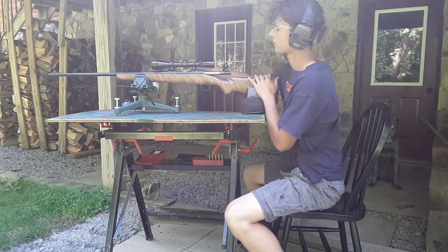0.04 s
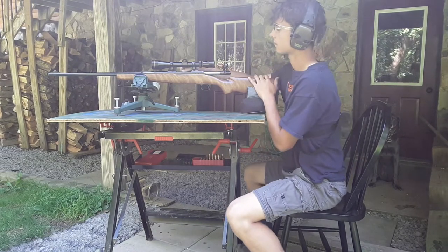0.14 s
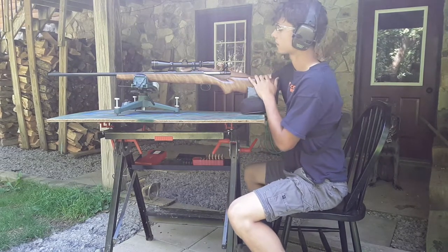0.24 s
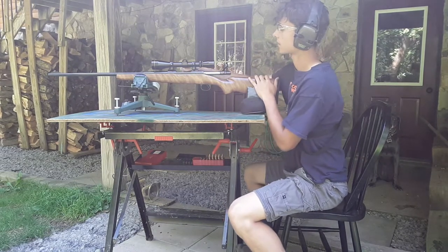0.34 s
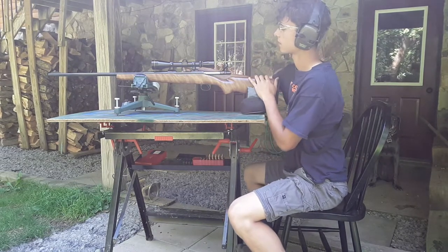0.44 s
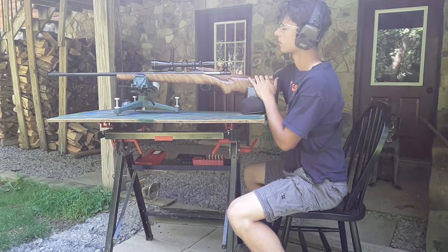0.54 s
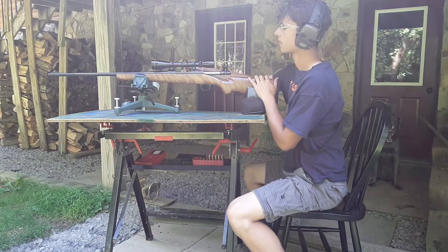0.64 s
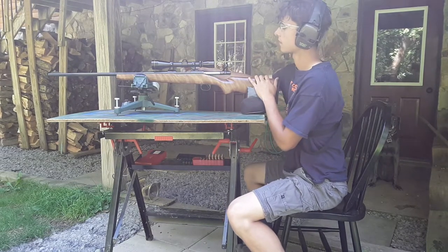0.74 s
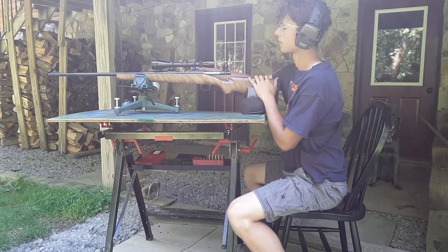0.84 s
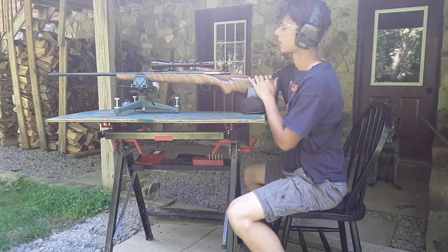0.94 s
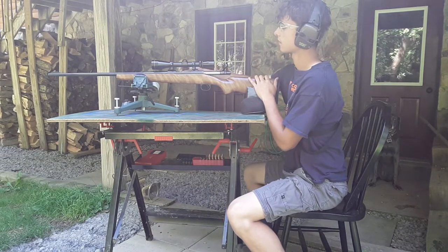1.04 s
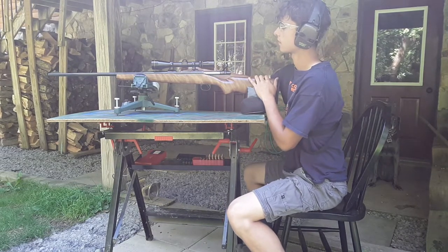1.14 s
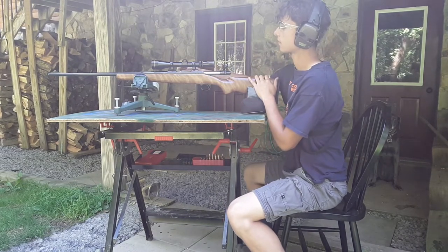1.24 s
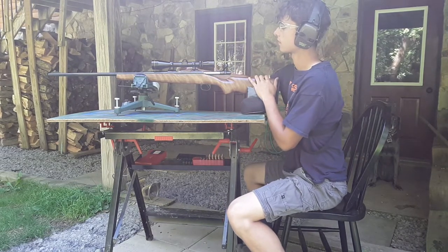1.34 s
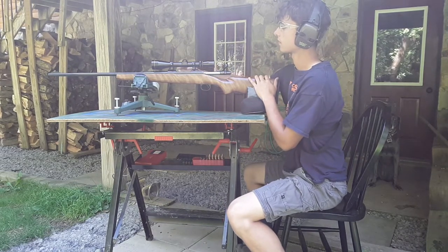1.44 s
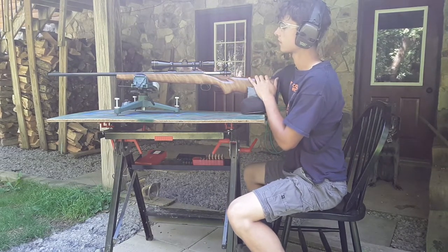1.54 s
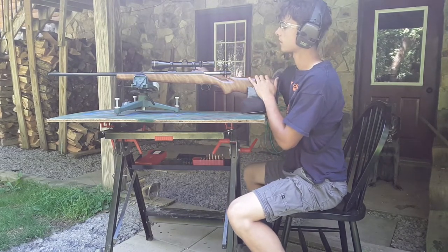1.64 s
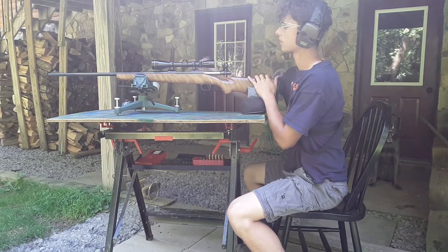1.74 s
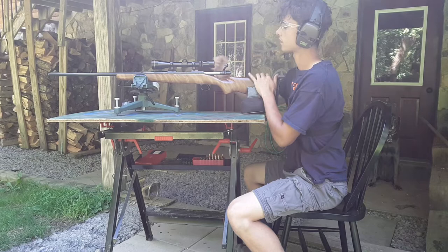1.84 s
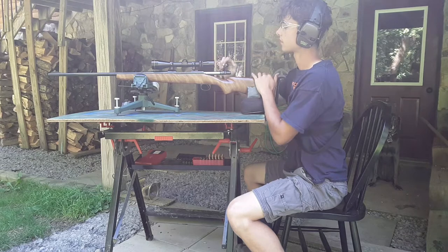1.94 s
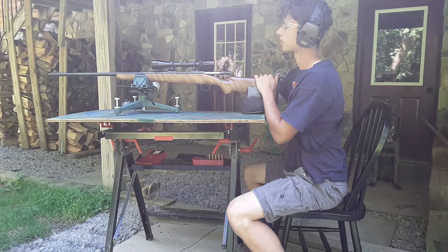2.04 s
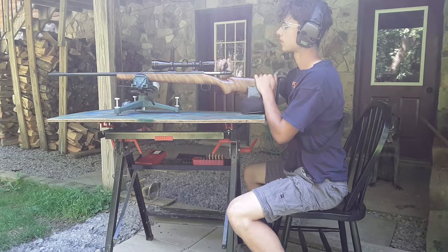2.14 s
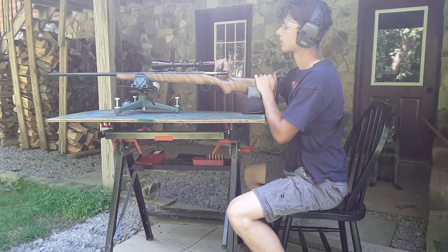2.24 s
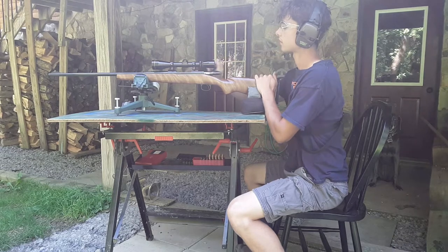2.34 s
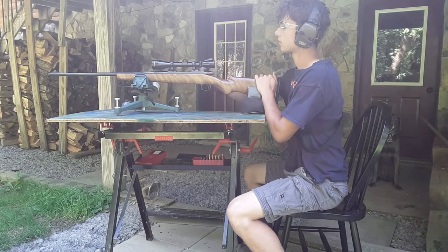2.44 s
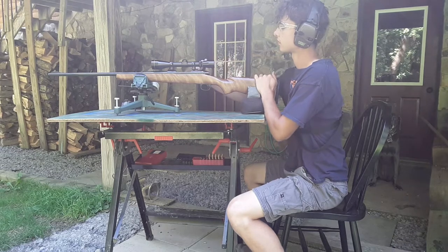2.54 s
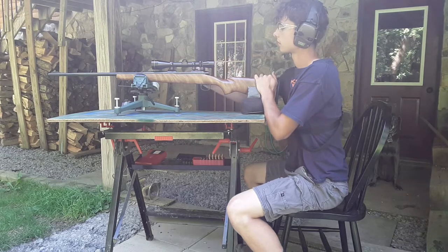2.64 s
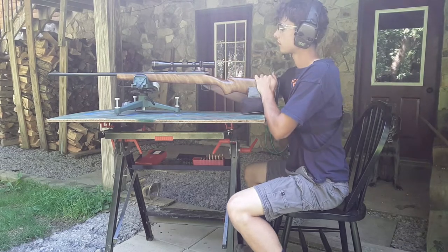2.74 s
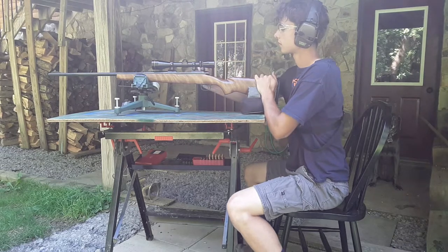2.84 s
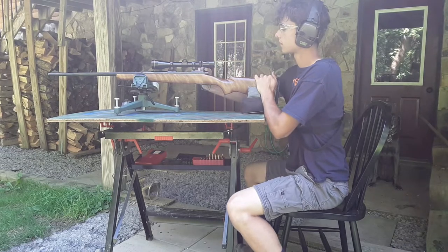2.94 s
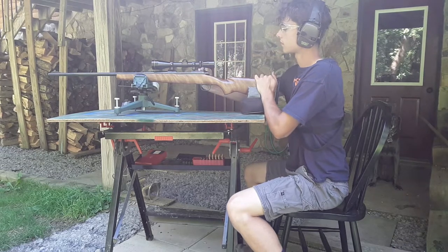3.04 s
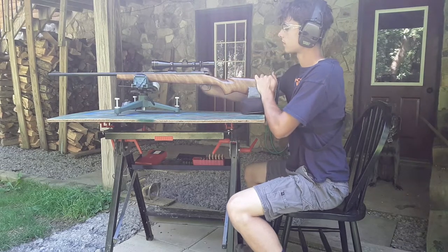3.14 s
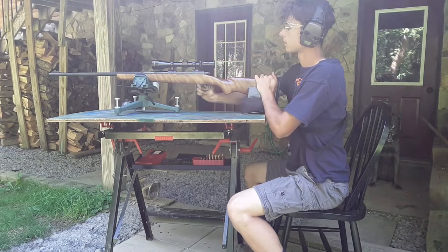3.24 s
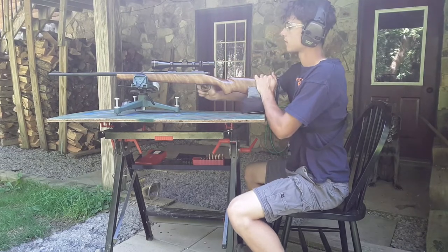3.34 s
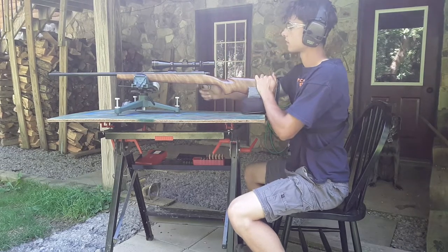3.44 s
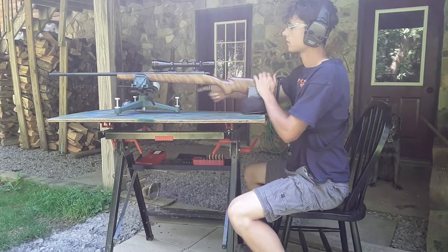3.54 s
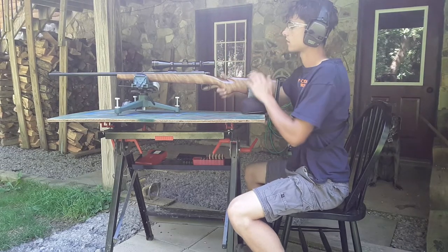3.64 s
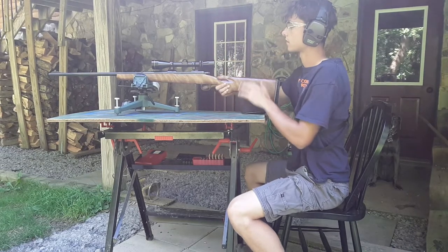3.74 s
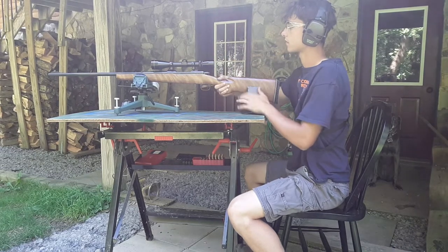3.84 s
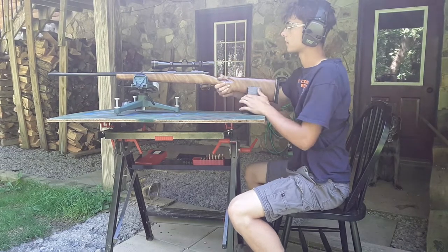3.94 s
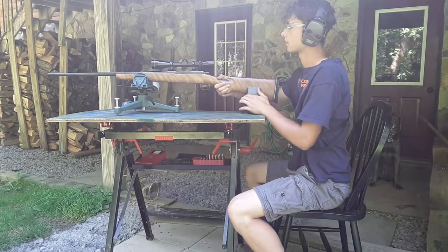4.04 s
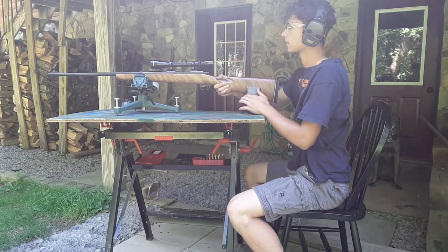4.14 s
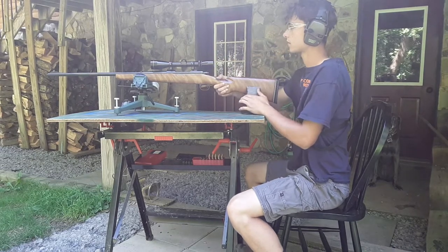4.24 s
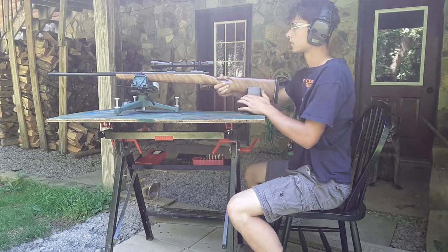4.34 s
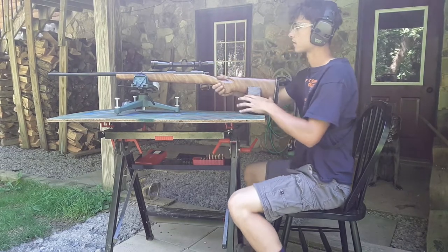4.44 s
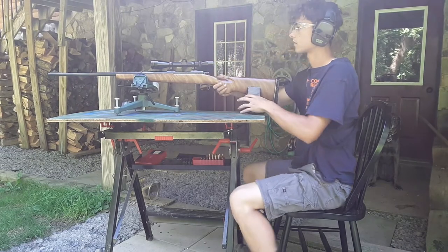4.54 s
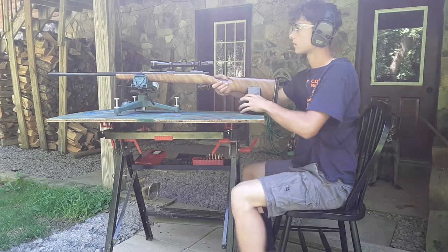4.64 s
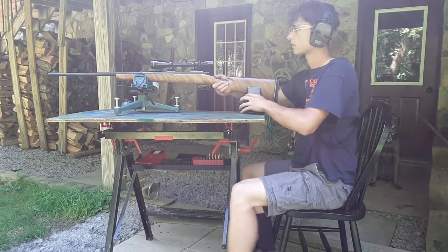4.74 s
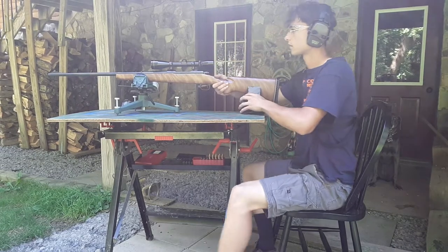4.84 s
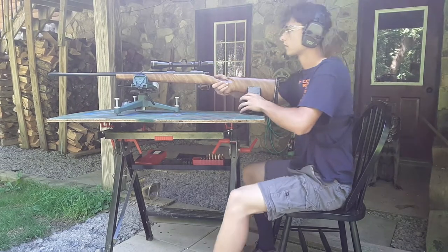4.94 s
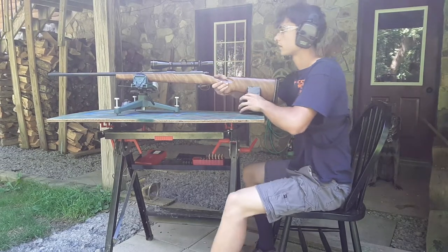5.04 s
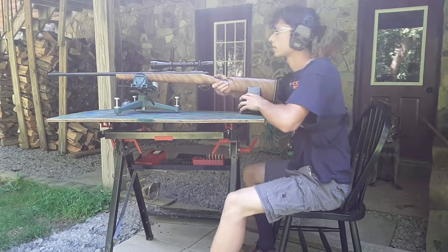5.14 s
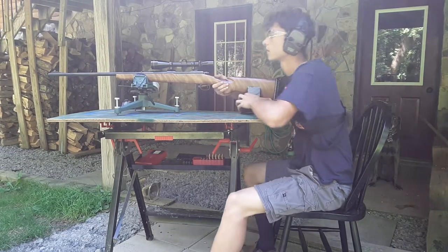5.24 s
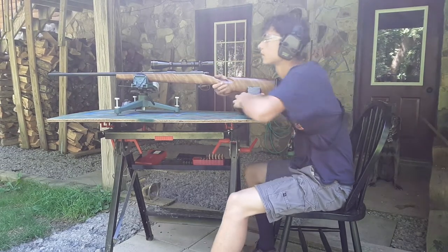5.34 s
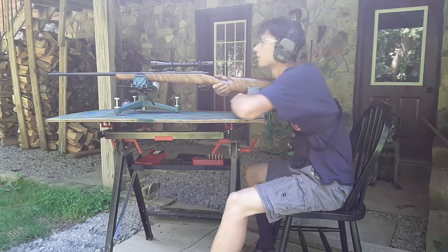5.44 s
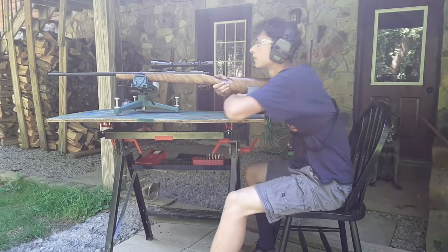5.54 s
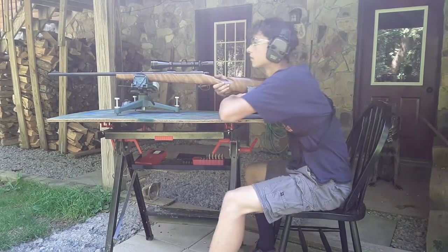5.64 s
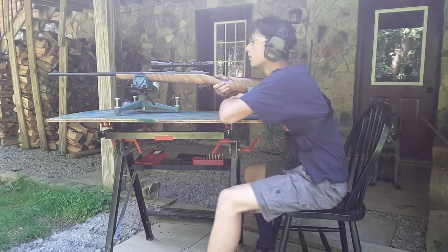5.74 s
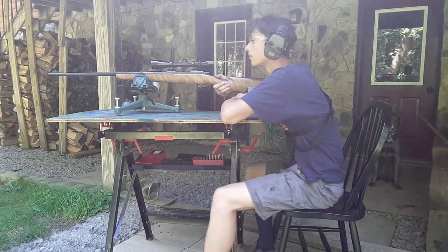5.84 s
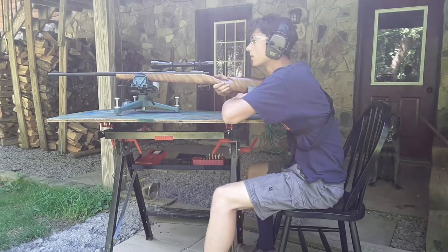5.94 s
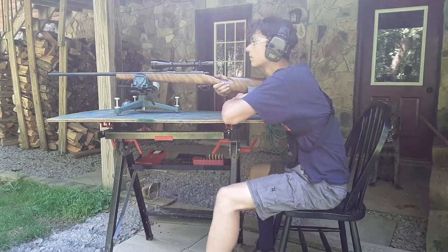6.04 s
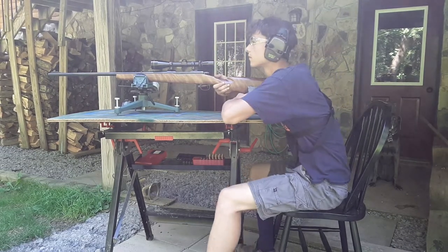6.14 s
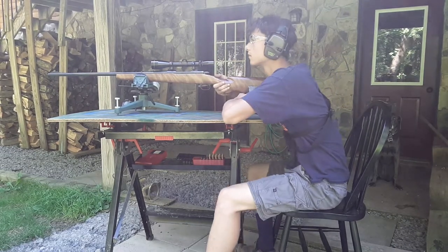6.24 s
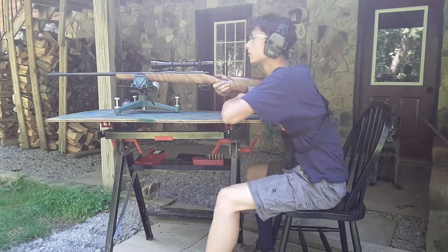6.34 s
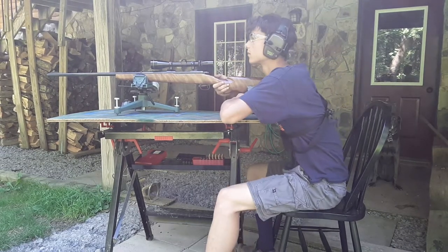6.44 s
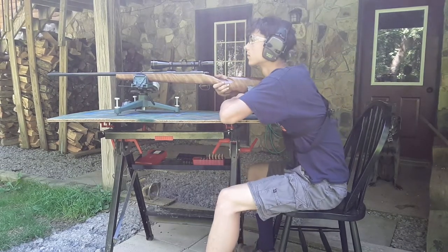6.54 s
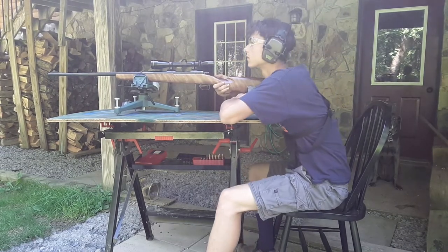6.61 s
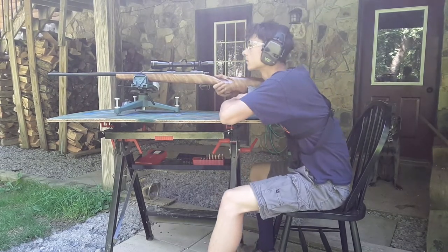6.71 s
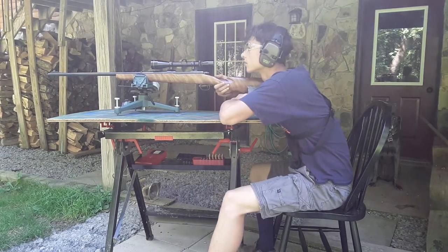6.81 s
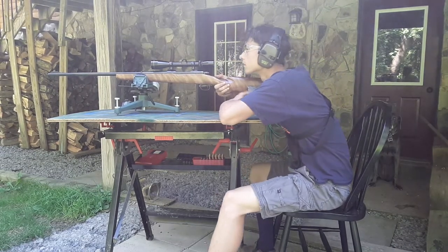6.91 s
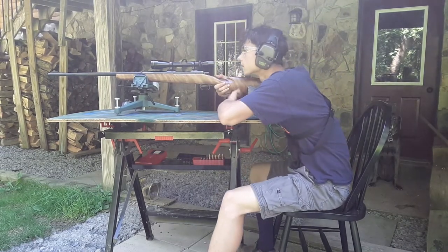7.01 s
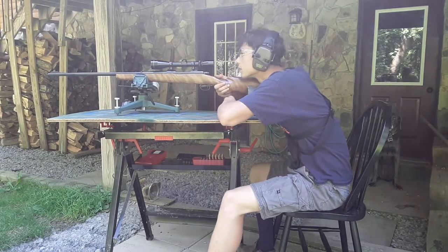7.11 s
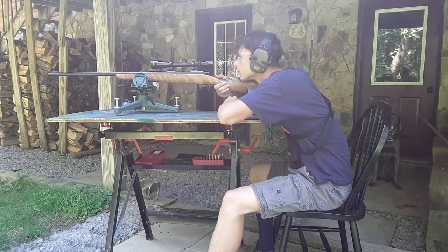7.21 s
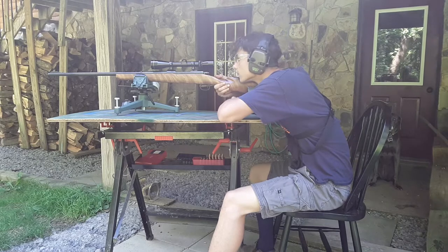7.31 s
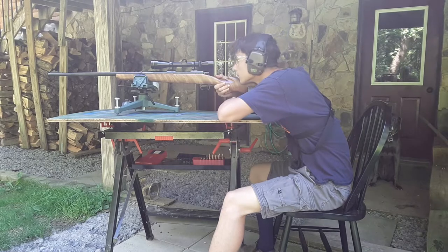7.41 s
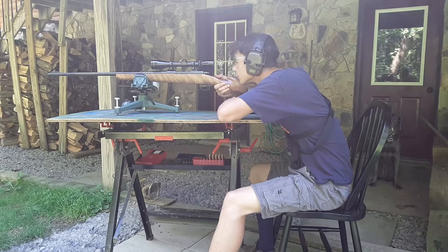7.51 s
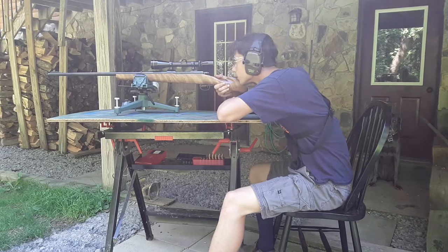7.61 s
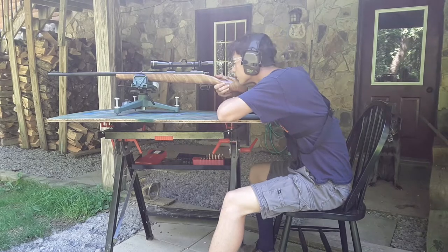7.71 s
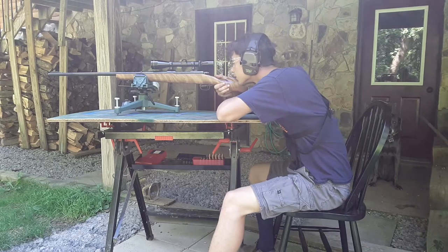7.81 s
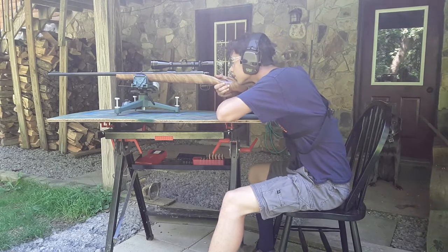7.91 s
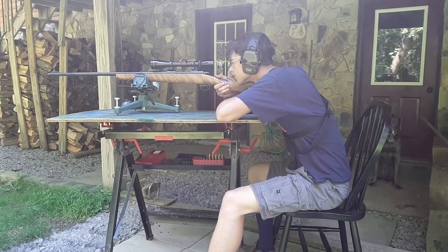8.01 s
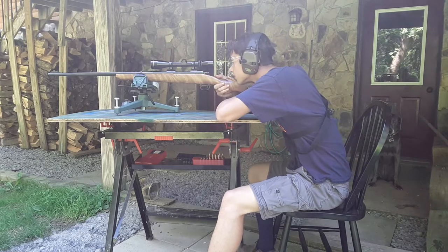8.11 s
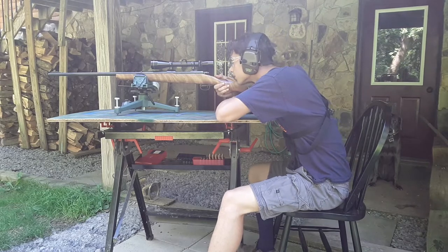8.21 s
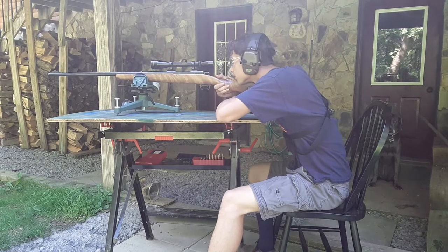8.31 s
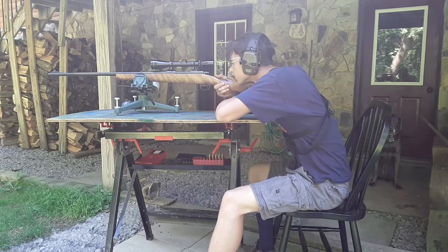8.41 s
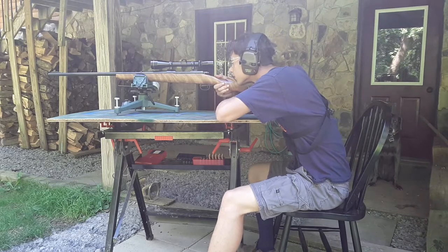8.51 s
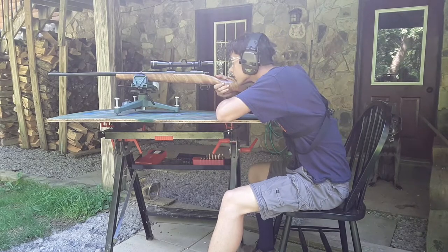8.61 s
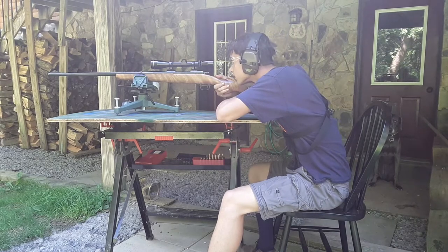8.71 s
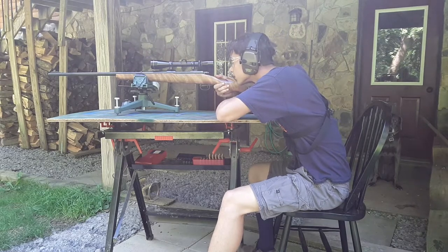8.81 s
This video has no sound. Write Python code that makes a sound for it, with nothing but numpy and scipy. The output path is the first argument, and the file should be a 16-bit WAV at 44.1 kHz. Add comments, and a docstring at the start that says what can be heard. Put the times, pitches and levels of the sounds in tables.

```python
"""A bolt-action rifle is loaded at a bench under a stone porch; hiss, rumble, a faint drone and far birds lie outside.
A brass cartridge clinks, then the bolt rubs along the raceway, is pushed home and locked, and a steel catch snaps.
The background dips around the fourth second; then the shooter settles with rustles, dull bumps and light knocks.
Blows are noise chatter plus decaying modes; rubbing, cloth and air are coloured noise; birds and drone are raspy sines.
The porch adds dense noise echoes."""
import sys
import numpy as np
from scipy import signal
from scipy.fft import rfft, irfft, next_fast_len
from scipy.io import wavfile
from scipy.ndimage import uniform_filter1d

SR = 44100
rng = np.random.default_rng(int(sys.argv[2]) if len(sys.argv) > 2 else 0)


def store_pcm(level_fs):
    """Save levels as 16-bit WAV."""
    pcm = np.round(np.clip(level_fs, -1, 1) * 32767).astype(np.int16)
    wavfile.write(sys.argv[1], SR, np.atleast_2d(pcm).T)


N = 391166
TIME = np.arange(N) / SR
AGE = np.arange(16384) / SR   # seconds since a blow
MILLISECOND = SR / 1000   # in samples; blow levels are rms over 1 ms
SIDES = np.array([[.5], [-.5]])   # left, right: splits a left-minus-right dB value

# modes of the struck cartridge: pitch_hz, level_db, t60_s
BRASS = [(1340, -28, 0.099), (2700, -1, 0.025), (3250, -9, 0.027), (4470, -2, .02), (4800, 1, 0.092),
         (4845, -2.5, 0.16), (6730, 1, 0.034), (7630, -9, 0.072), (10400, -21, 0.2), (10390, 2.5, .05),
         (13950, -24, 0.082)]
# modes of the raceway: pitch_hz, level_db, t60_s
RACEWAY = [(1320, -16, .03), (3090, -8, 0.019), (4890, 2, 0.029), (5290, 1.5, 0.04), (6680, 3.5, 0.033),
           (7370, 4.5, 0.028), (10950, -14, 0.084), (13900, -21, .07)]
# modes of the bolt: pitch_hz, level_db, t60_s
BOLT = [(830, -13, 0.02), (905, -5, 0.011), (1192, -17, 0.031), (1800, -5, 0.023), (3750, -2, 0.033),
        (4400, -17, 0.015), (5320, 1, 0.027), (6630, 2.5, 0.03), (6840, 4.5, 0.033)]
# modes of the steel catch: pitch_hz, level_db, t60_s
CATCH = [(665, -5, 0.019), (765, 0.5, 0.014), (1170, -11, 0.0039), (1266, -4, 0.028), (1680, 3.5, 0.017),
         (1860, 3.5, .017), (1940, -10, 0.013), (3024, -3, 0.031), (4230, -8, 0.022), (5630, -1, 0.013),
         (6550, 3.5, 0.02), (6850, 1.5, 0.02)]
# spectrum of distant rumble, also of rustling cloth: freq_hz, level_db
RUMBLE = [(60, -12), (130, 2), (200, -0.5), (300, -3.5), (450, -4), (700, -4), (900, -9.5), (1200, -12.5),
          (1600, -51)]
# spectrum of deep stirring: freq_hz, level_db
DEEP = [(15, -30), (28, -11), (50, -2), (100, 0), (150, -11.5), (300, -39.5)]


def from_db(db):
    """Decibels to gain."""
    return 10 ** (np.asarray(db) / 20)


def unit_energy(x):
    """Scale to energy 1 per channel."""
    return x / np.sqrt(np.sum(x ** 2, axis=-1, keepdims=True) + 1e-20)


def at_hz(points, hz):
    """Read a spectrum on a log-frequency axis."""
    f, value = np.transpose(points)
    return np.interp(np.log(hz + 1), np.log(f), value)


def bins(x):
    """Frequencies of a signal's spectrum."""
    return np.fft.rfftfreq(x.shape[-1], 1 / SR)


def colour(x, db):
    """Causal (minimum-phase) filter with the given gain at each frequency."""
    cepstrum = irfft(np.log(from_db(db)))
    half = cepstrum.shape[-1] // 2
    # fold negative time onto positive time
    cepstrum[..., 1:half] *= 2
    cepstrum[..., half + 1:] = 0
    return irfft(rfft(x) * np.exp(rfft(cepstrum)))


def even(x, size_bins=301):
    """Level out the broad colour of a random burst and keep its fine ripple."""
    power = uniform_filter1d(np.abs(rfft(x)) ** 2, size_bins, axis=-1)
    return unit_energy(colour(x, -10 * np.log10(power + 1e-12)))


def drift(rate_hz):
    """Slow chance: straight lines between random knots of spread 1."""
    knots = rng.standard_normal(8000)
    return np.interp(TIME * rate_hz, np.arange(len(knots)), knots)


def envelope(start_s, length_s, attack_s, release_s):
    """Rise, hold, then die away exponentially."""
    age = TIME - start_s
    rise = np.clip(age / attack_s, 0, 1)
    return rise * np.exp(-np.clip((age - length_s) / release_s, 0, 20))


def add(track, start_s, sound):
    """Lay a sound into a track."""
    start = round(start_s * SR)
    track[:, start:start + sound.shape[-1]] += sound[..., :N - start]


def noise_pair(t, shared_hz):
    """White noise for two sides; long waves reach both alike."""
    mid, side = rfft(rng.standard_normal((2, len(t))))
    apart = np.pi / 4 / (1 + (shared_hz / (bins(t) + 1)) ** 2)
    return irfft(mid * np.cos(apart) + 2 * SIDES * side * np.sin(apart))


def stereo_noise(spectrum, grain_db=0, grain_samples=32):
    """Coloured noise, mid rms 1, smooth or grainy; alike on both sides in the bass, leaning left in the treble."""
    # left-right correlation: freq_hz, likeness
    likeness = [(60, 0.23), (130, 0.9), (290, 0.76), (640, 0.3), (1400, 0), (15000, 0)]
    # stereo balance: freq_hz, left_minus_right_db
    balance = [(60, -3), (200, 4.5), (700, 3.5), (4400, 2.5), (8100, 8.5), (15000, 14.5)]
    size = next_fast_len(N, True)
    grains = from_db(grain_db * rng.standard_normal(size))[np.arange(size) // grain_samples]
    mid, side = rfft(rng.standard_normal((2, size)) * grains)
    hz = np.fft.rfftfreq(size, 1 / SR)
    alike = at_hz(likeness, hz)
    both = np.sqrt(1 + alike) * mid + 2 * SIDES * np.sqrt(1 - alike) * side
    gain_db = at_hz(spectrum, hz) + SIDES * at_hz(balance, hz)
    noise = irfft(both * from_db(gain_db), size)[:, :N]
    return noise / np.std(noise.mean(axis=0))


def tone(pitch_hz, rasp, flutter_db):
    """A far tone of rms about 1; quick wobbles of pitch make it raspy."""
    phase = 2 * np.pi * np.cumsum(pitch_hz * (1 + rasp * drift(400))) / SR
    return np.sqrt(2) * from_db(flutter_db * drift(25)) * np.sin(phase)


def ringing(modes, spread_db=2.0, rise_s=0.00052):
    """Free ring of a struck part; short waves reach the two sides out of step."""
    hz, db, t60_s = np.transpose(modes)[:, :, None]
    phase = rng.uniform(0, 2 * np.pi, hz.shape)
    phase = phase + np.minimum(hz / 3000, 1.3) * rng.standard_normal((2, *hz.shape))
    strength_db = db + spread_db * rng.standard_normal(hz.shape)
    waves = from_db(strength_db - 60 * AGE / t60_s) * np.sin(2 * np.pi * hz * AGE + phase)
    return unit_energy(waves.sum(axis=1) * (1 - np.exp(-AGE / rise_s)))


def blow(part, level_db, weight_db, bright_db, chatter_s, ring_db, bite=0.98, weight_hz=1500, bright_hz=8500):
    """A few ms of chatter between two surfaces and the ring of the struck part; a sharp edge brightens both."""
    # broad colour of the chatter, steel rattling on steel: freq_hz, level_db
    rattle = [(100, -43), (450, -19.5), (800, -5.5), (1400, -2.5), (2500, -3), (3500, -0.5), (5000, 1.5),
              (7400, 2), (8800, -8), (11000, -12.5), (13500, -20.5), (16000, -27)]
    # stereo lean of the rifle, left in the treble: freq_hz, left_minus_right_db
    rifle_side = [(900, 0), (2500, 7), (5500, 7.5), (10400, 5.5)]
    damping_db_per_s = 1298   # longer chatter damps the ring more
    hz = bins(AGE)
    low = 1 / (1 + (hz / weight_hz) ** 4)
    high = 1 / (1 + (bright_hz / (hz + 1)) ** 6)
    rounds = AGE / chatter_s
    pressure = (1 - np.exp(-rounds / bite)) * np.exp(-rounds)   # the surfaces bite, then settle
    chatter = even(noise_pair(AGE, shared_hz=1180) * pressure)
    chatter = unit_energy(colour(chatter, at_hz(rattle, hz) + weight_db * low))
    sound = chatter + from_db(ring_db - damping_db_per_s * chatter_s) * ringing(part)
    sound = colour(sound, bright_db * high + SIDES * at_hz(rifle_side, hz))
    return from_db(level_db) * np.sqrt(MILLISECOND) * sound


def outdoors(hiss_db=0.16, rumble_db=-12.5, deep_db=-69.0):
    """High hiss over a distant rumble, deep stirrings of air and a far drone that sinks as it swells and fades."""
    # spectrum of the hiss: freq_hz, level_db
    hiss_spectrum = [(530, -25), (900, -14), (979, -15), (1420, -10), (1900, -2.5), (2630, -4.5),
                     (3110, -2.5), (5220, -2), (6640, 0.5), (8450, -11.5), (9770, -13), (12600, -25),
                     (15100, -35.5), (16000, -36)]
    # background level, dipping around the fourth second: time_s, level_db
    background = [(0, -55), (1.8, -55), (2.6, -53), (3.0, -57), (3.35, -55), (3.8, -60.5), (4.3, -60),
                  (4.62, -53), (6.5, -53.5), (7.7, -52.5), (8.87, -52.5)]
    rumble_follows = 0.99   # dB per dB of background swing
    drone_hz, drone_sag_hz_per_s, drone_rasp = 384, 3.9, .022
    drone_db, drone_peak_s, drone_fade_db_per_s2 = -73, 4.66, 0.6
    drone_full_db, drone_follows = -55.5, 3.1   # dB lost per dB of background under this level

    level_db = np.interp(TIME, *np.transpose(background))
    mean_db = level_db.mean()
    swing_db = rumble_follows * (level_db - mean_db)
    hiss = from_db(hiss_db + level_db + 0.45 * drift(15)) * stereo_noise(hiss_spectrum)
    rumble = from_db(rumble_db + mean_db + swing_db + 0.52 * drift(8.7)) * stereo_noise(RUMBLE)
    deep = from_db(deep_db + 2.3 * drift(4)) * stereo_noise(DEEP)

    dip_db = drone_follows * np.minimum(level_db - drone_full_db, 0)
    fade_db = drone_fade_db_per_s2 * (TIME - drone_peak_s) ** 2
    drone_gain = from_db(drone_db + dip_db + 1.9 * drift(5) - fade_db)
    drone = drone_gain * tone(drone_hz - drone_sag_hz_per_s * TIME, drone_rasp, flutter_db=3.0)
    return hiss + rumble + deep + drone


def birds():
    """Each note of a far bird scoops up to its pitch exponentially, fading all the while."""
    # bird notes: start_s, length_s, pitch_hz, level_db, rasp (share of pitch), scoop (share of pitch)
    notes = [(2.15, 0.091, 3500, -51, 0.015, .03), (4.6, .12, 3050, -63, 0.039, 0.038),
             (6.09, .07, 2850, -62, .008, .03), (6.22, .22, 3190, -58, .016, 0.071),
             (7.61, .12, 4460, -56, .025, 0.012), (7.665, 0.31, 3505, -52, .012, .24),
             (8.727, .14, 5030, -52, .14, 0.057), (8.835, .04, 3160, -57, .012, 0.0067)]
    attack_s, release_s, fade_db_per_s, scoop_s = 0.0073, 0.047, 27, 0.00704
    out = 0
    for start_s, length_s, hz, db, rasp, scoop in notes:
        age = TIME - start_s
        pitch_hz = hz * (1 - scoop * np.exp(-np.clip(age / scoop_s, 0, 20)))
        loudness = from_db(db - fade_db_per_s * np.maximum(age, 0))
        loudness = loudness * envelope(start_s, length_s, attack_s, release_s)
        out = out + loudness * tone(pitch_hz, rasp, flutter_db=2.0)
    return out


def porch(x, first_s=0.0025, hold_s=0.015, t60_s=0.14, wall_s=0.0224, wall_db=-12.0,
          yard_db=-23.0, yard_t60_s=0.73, centring_db=1.5):
    """Dense echoes from bench, floor and roof, a slap from the rough wall, and a faint long tail from the yard."""
    t = np.arange(32768) / SR
    swell = np.clip(t / first_s - .5, 0, 1)
    decay = from_db(-60 * np.maximum(t - hold_s, 0) / t60_s) + from_db(yard_db - 60 * t / yard_t60_s)
    slap = from_db(wall_db) * np.exp(-((t - wall_s) / 0.0028) ** 2)
    echoes = even(noise_pair(t, shared_hz=1090) * (swell * decay + slap), size_bins=151)
    stone_db = at_hz([(800, 2.4), (3000, 2.3), (7000, 0.39), (10000, 3.3), (15000, 3.1)], bins(t))
    echoes = colour(echoes, stone_db)
    return signal.fftconvolve(x, echoes, axes=1)[:, :N] * from_db(-SIDES * centring_db)


def shooter(uneven_db=0.5):
    """Each move brings a dull rustle of cloth on the bench and a deep stirring under it."""
    # moves (works the bolt, lets go, leans in, settles his aim): start_s, length_s, rustle_db, deep_db
    moves = [(2.114, 0.51, -64.5, -60), (3.393, .35, -77, -65.5), (4.424, 2.18, -66.5, -72),
             (6.55, 1.25, -69, -64.5), (8.25, 0.14, -71, -65.5)]
    attack_s, release_s = 0.057, 0.16
    rustle, deep = 0, 0
    for start_s, length_s, rustle_db, deep_db in moves:
        moving = envelope(start_s, length_s, attack_s, release_s)
        rustle = rustle + from_db(rustle_db) * moving
        deep = deep + from_db(deep_db) * moving
    return from_db(uneven_db * drift(12)) * (rustle * stereo_noise(RUMBLE) + deep * stereo_noise(DEEP))


def bumps(rise_s=0.0038, dying_s=0.034, width=1.45, apart=0.3):
    """Soft blows of hands, stock and elbows shake the wooden bench in a broad band."""
    # dull bumps: start_s, level_db, centre_hz
    bench_bumps = [(1.925, -34.5, 182), (1.961, -41, 238), (2.149, -34.5, 174), (2.196, -36, 128),
                   (2.266, -36, 130), (2.502, -35.5, 163), (3.201, -40.5, 157), (3.438, -42, 72),
                   (4.479, -44, 526), (4.63, -35.5, 436), (4.916, -40.5, 221), (5.062, -42.5, 293),
                   (5.202, -39.5, 400), (6.711, -43, 99), (6.869, -39, 69), (6.905, -37.5, 92),
                   (7.67, -43.5, 60), (7.77, -43, 55)]
    out = np.zeros((2, N))
    shape = (1 - np.exp(-AGE / rise_s)) * np.exp(-AGE / dying_s)
    for start_s, db, hz in bench_bumps:
        push = rng.standard_normal(len(AGE)) + apart * rng.standard_normal((2, len(AGE)))
        band = signal.butter(2, [hz / width, hz * width], "band", fs=SR, output="sos")
        wood = unit_energy(signal.sosfilt(band, push) * shape)
        add(out, start_s, from_db(db) * np.sqrt(MILLISECOND) * wood)
    return out


def knocks():
    """Hands and rest knock lightly on the wooden stock: short chatter and the ring of the stock."""
    # modes of the stock: pitch_hz, level_db, t60_s
    stock = [(465, -11, 0.016), (1050, -27, 0.015), (1924, 1.5, 0.018), (2270, 2.5, 0.011),
             (2870, 6, 0.0071), (3166, -2, 0.021), (4200, 0, 0.016), (6250, -3, 0.029), (6880, -1.5, 0.023)]
    # light knocks: start_s, level_db, weight_db (below 1.5 kHz), chatter_s
    stock_knocks = [(.148, -42, 7, 0.0052), (0.736, -35.5, -7, 0.0054), (1.9192, -39.5, -7, 0.0044),
                    (2.645, -33.5, 9.5, 0.0029), (3.163, -35.5, 6, 0.003), (3.504, -47, 10, 0.0018),
                    (3.693, -42.5, 0, 0.003), (4.545, -36.5, 1, 0.0032), (4.640, -37.5, 12, 0.0062),
                    (4.9165, -36, 16.5, 0.0043), (5.316, -39.5, -3, 0.0069), (5.7793, -26, 4, 0.0012),
                    (5.979, -37.5, 9, 0.0068), (6.029, -39, 15, .0012), (6.422, -39, 6, 0.0038)]
    bright_db, ring_db = 0.5, 3.5   # above 8.5 kHz; ring against chatter before damping
    out = np.zeros((2, N))
    for start_s, db, weight_db, chatter_s in stock_knocks:
        add(out, start_s, blow(stock, db, weight_db, bright_db, chatter_s, ring_db))
    return out


def slide(grain_db=3.5):
    """Cartridge and bolt rub along the raceway in fine grains of noise."""
    # strokes of sliding metal: start_s, length_s, level_db
    strokes = [(0.37, .04, -56), (2.146, 0.077, -56), (2.253, 0.12, -45.5), (2.418, 0.14, -54.5)]
    # colour of the rubbing, which sets the raceway singing: freq_hz, level_db
    rubbing_colour = [(100, -24), (800, -7.5), (1400, 3.5), (3200, 1.5), (4400, 3), (5100, 7), (6000, 0),
                      (7400, -1), (9000, -19), (11000, -18), (16000, -35)]
    attack_s, release_s = 0.015, 0.056
    rubbing = 0
    for start_s, length_s, db in strokes:
        rubbing = rubbing + from_db(db) * envelope(start_s, length_s, attack_s, release_s)
    return rubbing * from_db(1.1 * drift(120)) * stereo_noise(rubbing_colour, grain_db=grain_db)


def contacts(weight_share=0.24):
    """Cartridge, bolt and catch strike; the heavier the blow, the more the whole action rings along."""
    # metal meets metal: start_s, part, level_db, weight_db (below 1.5 kHz), bright_db (above 8.5 kHz), chatter_s
    strikes = [ (0.035, BRASS, -38, -1.5, -14, 0.0021), (.366, BRASS, -25.5, -17, -23, 0.0042),
               (.399, BRASS, -20.5, -13, 1.5, 0.0011), (.407, BRASS, -26, -13, 10, 0.00084),
               (.420, BRASS, -25.5, -7, -17, 0.0026), (.439, BRASS, -33, -8, -13, .003),
               (.913, BRASS, -39.5, -9, -30, 0.0017), (1.061, BRASS, -39.5, -6, -14, 0.0025),
               (1.923, RACEWAY, -29.5, -4, -12, 0.0041), (2.1465, BOLT, -33.5, -4, -25, .0015),
               (2.230, RACEWAY, -24.5, -2, -18, 0.0033), (2.263, RACEWAY, -15, -11, 4, 0.0027),
               (2.282, RACEWAY, -32, -16, 17, .003), (2.316, RACEWAY, -19, -11, 2.5, 0.0045),
               (2.327, RACEWAY, -26.5, 3, -1, 0.0067), (2.431, BOLT, -35.5, 8, -7, 0.0033),
               (2.439, BRASS, -31, 13, 3, 0.0068), (2.4838, BOLT, -24, -30, -6, 0.00082),
               (2.492, BOLT, -25.5, -1, 11.5, .0048), (2.501, BOLT, -10, -2.5, -0.5, 0.0023),
               (3.118, RACEWAY, -39.5, -28, 14, 0.0021), (3.15, RACEWAY, -36.5, -5, 9, 0.0028),
               (3.1984, CATCH, -11, 1.5, 6, 0.0014)]
    # modes of the whole action: pitch_hz, level_db, t60_s
    action = [(654, -13.5, 0.1), (808, 2, 0.074), (897, -7.5, 0.14), (1212, -4, 0.074), (1318, -7, 0.1),
              (1827, 4, 0.12), (3000, -4, 0.08), (5200, -6, 0.09), (6853, -7, 0.13)]
    ring_db, action_db = 2, -20.5   # part ring against chatter before damping; action ring at zero weight
    out = np.zeros((2, N))
    for start_s, part, db, weight_db, bright_db, chatter_s in strikes:
        add(out, start_s, blow(part, db, weight_db, bright_db, chatter_s, ring_db))
        action_gain = from_db(db + action_db + weight_share * weight_db) * np.sqrt(MILLISECOND)
        add(out, start_s, action_gain * ringing(action))
    return out


def scene():
    """The rifle's blows are heard directly and off the porch; the birds only by their echoes."""
    metal_porch_db, knock_porch_db = -5, -6.5
    metal, wood = contacts(), knocks()
    echoes = porch(from_db(metal_porch_db) * metal + from_db(knock_porch_db) * wood + birds())
    return outdoors() + shooter() + bumps() + slide() + wood + metal + echoes


def record(dry):
    """Peaks stop at full scale and the top is cut steeply."""
    cutoff_hz = 15900
    lowpass = signal.ellip(10, .1, 70, cutoff_hz, fs=SR, output="sos")
    return signal.sosfilt(lowpass, np.clip(dry, -1, 1))


dry = scene()
out = record(dry)
store_pcm(out)
```